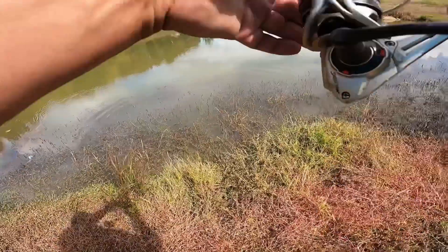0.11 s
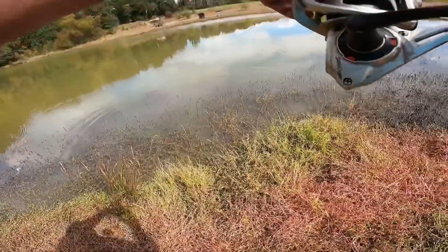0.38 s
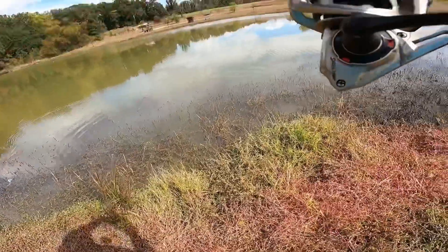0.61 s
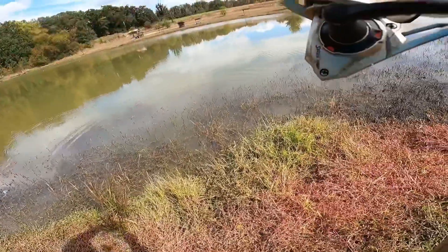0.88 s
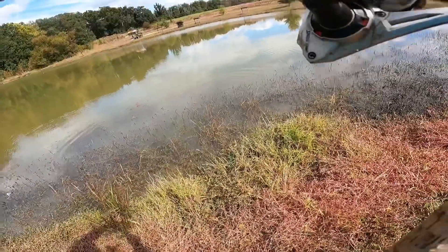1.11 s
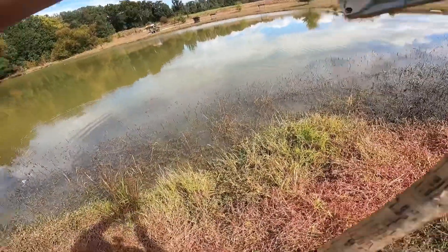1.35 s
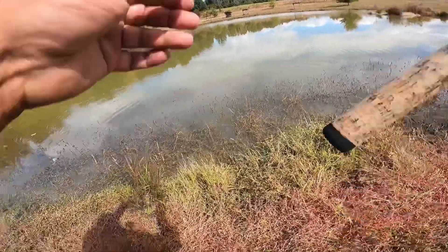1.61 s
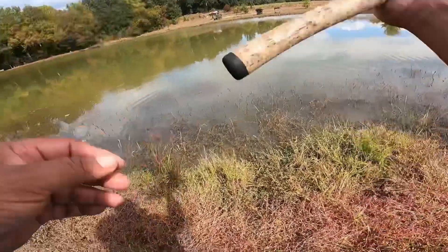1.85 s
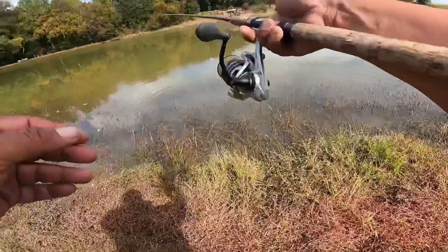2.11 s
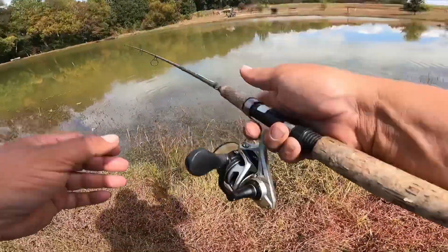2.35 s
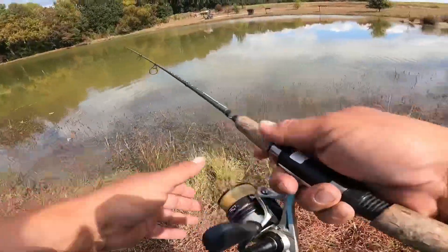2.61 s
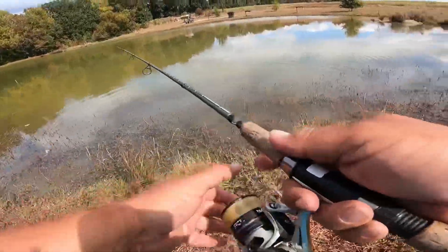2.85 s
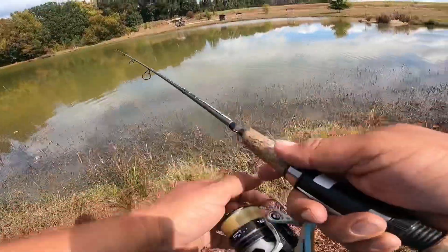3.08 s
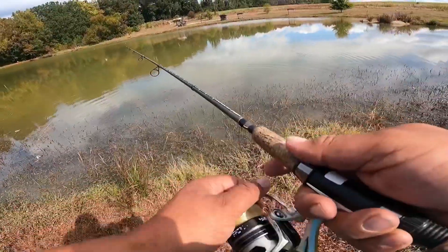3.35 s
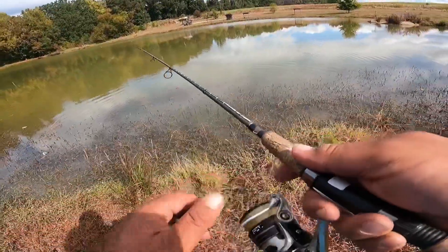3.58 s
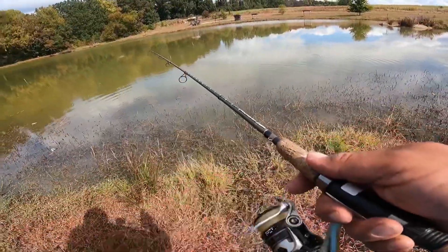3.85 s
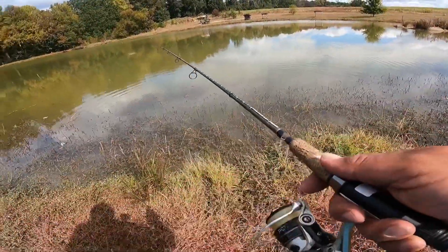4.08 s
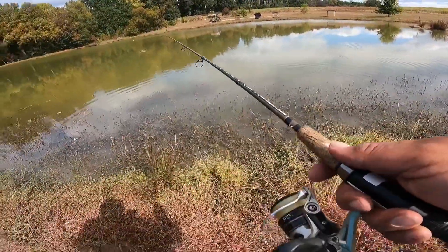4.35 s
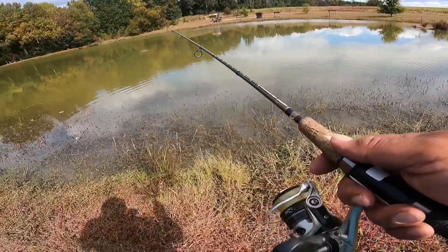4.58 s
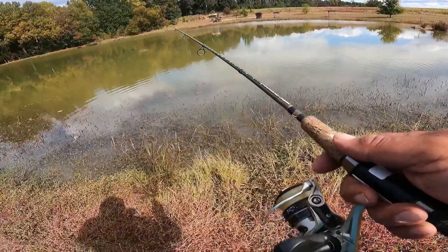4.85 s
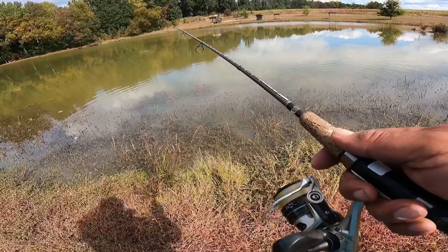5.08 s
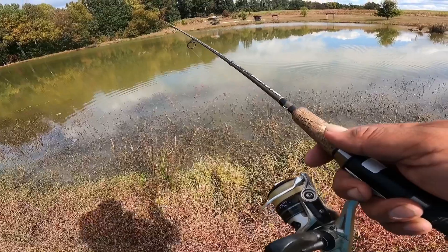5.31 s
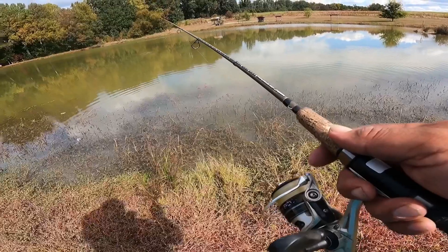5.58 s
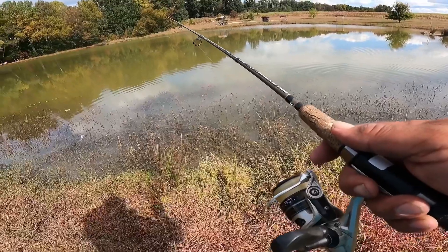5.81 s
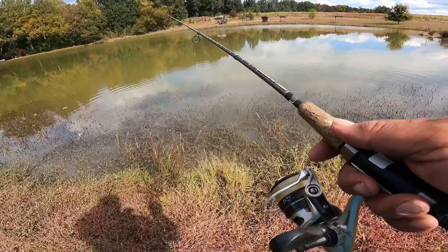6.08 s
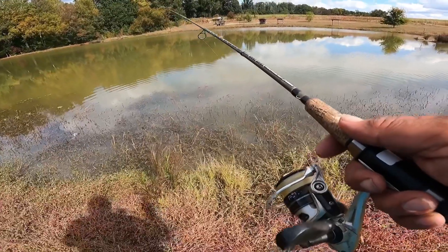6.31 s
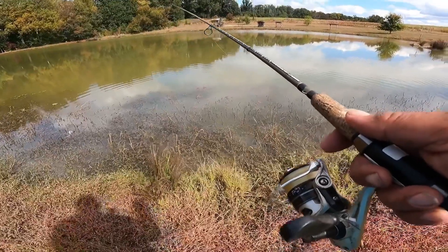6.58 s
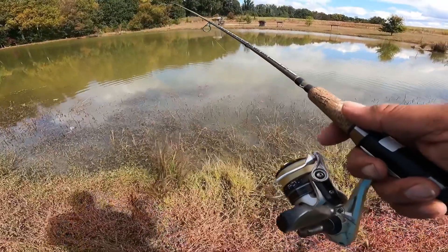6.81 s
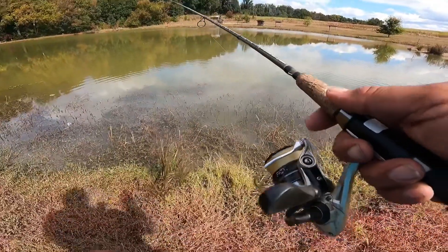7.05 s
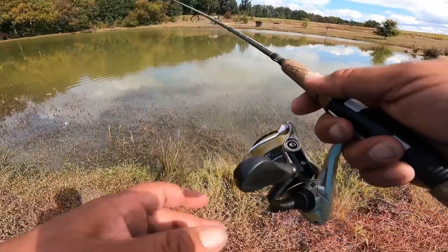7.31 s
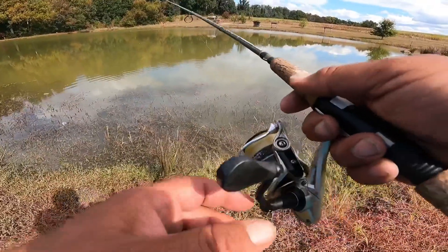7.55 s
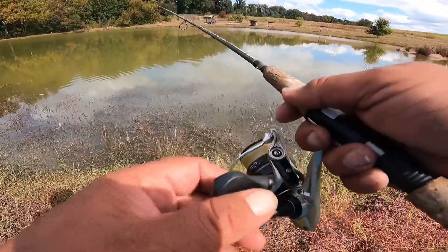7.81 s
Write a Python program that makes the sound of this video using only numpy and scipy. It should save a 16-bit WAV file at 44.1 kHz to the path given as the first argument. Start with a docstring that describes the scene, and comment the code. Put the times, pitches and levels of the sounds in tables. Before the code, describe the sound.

Outdoors by a pond, a katydid buzzes then ticks, a far engine chugs, and a handled reel gives two loud sharp clacks.

```python
"""Fishing reel in an insect field

A fishing reel is handled close by: cracks and ringing wire as its bail snaps open and shut, with ragged
slides, small ticks and cork thuds. A far engine of steady orders and puffing roar idles and slows.
A near katydid, noise through wing resonances, buzzes and then ticks in single strokes. Coloured noise is
the far chorus; raspy chips, cricket trills, one falling bird chirp and low wind lumps complete the field."""
import sys
import numpy as np
from scipy import signal
from scipy.fft import rfft, irfft, next_fast_len
from scipy.io import wavfile
from scipy.ndimage import uniform_filter1d

SR = 44100
rng = np.random.default_rng(int(sys.argv[2]) if len(sys.argv) > 2 else 0)


def dump(signal):
    """Clip the signal to [-1, 1] and save it as 16-bit WAV at the path in sys.argv[1]."""
    limited = np.clip(np.atleast_2d(signal).T, -1, 1)
    pcm = np.round(limited * 32767).astype(np.int16)
    wavfile.write(sys.argv[1], SR, pcm)


def field_ratio(decibels):
    """Amplitude ratio for a level in dB (20 dB per decade); scalars and array-likes work."""
    return 10 ** (np.asarray(decibels, dtype=float) / 20)


N = 349618
T = np.arange(N) / SR


def evened(x):
    """Scales to rms 1."""
    return x / np.sqrt(np.mean(x ** 2) + 1e-20)


def read(points, hz):
    """Reads a spectrum table at hz, along a logarithmic frequency axis."""
    f, value = np.transpose(points)
    return np.interp(np.log(hz + 1), np.log(f + 1), value)


def curve(rows, axis=1):
    """Draws one column of a table as a line over time."""
    return np.interp(T, np.array(rows)[:, 0], np.array(rows)[:, axis])


def swells(rows, rest_db):
    """Gain over time: bell-shaped swells (time [s], spread [s], level [dB]) above a resting level."""
    power = field_ratio(2 * rest_db)
    power = power + sum(field_ratio(2 * db) * np.exp(-((T - s) / spread) ** 2) for s, spread, db in rows)
    return np.sqrt(power)


def wander(width):
    """Slow random drift, smoothed over width samples, rms 1."""
    return evened(uniform_filter1d(rng.standard_normal(N), size=width))


def add(mix, s, sound):
    """Mixes a sound in at s seconds."""
    part = mix[..., round(s * SR):][..., :sound.shape[-1]]
    part += sound[..., :part.shape[-1]]


def panned(x, db):
    """Places a mono sound by its left-right level difference."""
    return x * field_ratio(np.array([[db / 2], [-db / 2]]))


# Stereo width of the noise beds: (frequency [Hz], left-right likeness [1 = same])
LIKENESS = [(60, 1), (150, 0.74), (380, 0.94), (950, 0.57), (2380, 0.31), (5980, 0.75), (15000, 0.26)]


def noise(spectrum, patchy_db):
    """Stereo noise of a given colour whose level varies in patches over time and frequency, rms 1."""
    hz = np.fft.rfftfreq(1024, 1 / SR)
    a, b, c, d, patches = rng.standard_normal((N // 256 + 5, 513, 5)).T
    patches = uniform_filter1d(patches, size=8, axis=0)
    patches = evened(uniform_filter1d(patches, size=14, axis=1))
    same = np.clip(read(LIKENESS, hz), -1, 1)[:, None]
    left = a + 1j * b
    right = same * left + np.sqrt(1 - same ** 2) * (c + 1j * d)
    z = np.array([left, right]) * field_ratio(read(spectrum, hz)[:, None] + patchy_db * patches)
    return evened(signal.istft(z, nperseg=1024, noverlap=768)[1][:, :N])


def rasp(resonances, drift_db=1.84):
    """Noise through resonances, each applied twice for steep flanks and swelling on its own, rms 1."""
    out = np.zeros(N)
    for hz, width, db in resonances:
        b, a = signal.iirpeak(hz, hz / width, SR)
        band = signal.lfilter(b, a, signal.lfilter(b, a, rng.standard_normal(N)))
        out += field_ratio(db + drift_db * wander(SR // 8)) * evened(band)
    return evened(out)


# Colour of the far chorus: (frequency [Hz], relative level [dB per Hz])
CHORUS_COLOUR = [(470, -34), (800, -14), (1100, 0.5), (2500, -28), (3150, -22), (3450, 4.5), (3900, 4.5),
                 (4250, -24), (5050, -19), (7450, -9), (8900, -1), (9500, -2), (10300, -12.5), (12800, -8),
                 (15000, -24), (16000, -39.5)]


def far_chorus():
    """Many far insects blended into a patchy noise bed."""
    return field_ratio(-61.5) * noise(CHORUS_COLOUR, patchy_db=1.8)


# Engine speed: (time [s], cycles per second [Hz])
ENGINE_SPEED = [(0, 14.25), (2, 14.16), (4.5, 14.12), (5.5, 14.01), (7.93, 13.91)]
# Strength of the engine orders: (multiple of the cycle [-], relative level [dB])
EXHAUST_ORDERS = [(2, -19), (3, -15), (4, 0), (5, -3), (6, -3.5), (7, -2), (8, -9), (9, -5), (11, -12.5),
                  (12, -13.5), (13, -11.5), (14, -20.5)]
# How the engine carries over the field: (time [s], relative level [dB])
CARRY_OVER_FIELD = [(0, -54), (2.85, -50), (3.1, -46.5), (3.65, -43), (4.7, -47.5), (5.3, -56.5),
                    (5.75, -49.5), (6.3, -45), (6.9, -52.5), (7.93, -55)]
# Swelling of the exhaust roar: (time [s], relative level [dB])
ROAR_LEVEL = [(0, -62.5), (.7, -59), (1.5, -57.5), (2.15, -58), (2.35, -62.5), (2.76, -56), (3.82, -56.5),
              (4.25, -60), (4.65, -57), (5.2, -60), (5.87, -54), (6.47, -57), (6.8, -60.5), (7.93, -62)]
# Colour of the exhaust roar: (frequency [Hz], relative level [dB per Hz])
ROAR_COLOUR = [(200, -27), (290, -0.5), (360, 1.5), (450, 0.5), (600, -6.5), (760, -20), (1000, -35.5)]
# Colour of the upper roar, strongest when the path is clear: (frequency [Hz], relative level [dB per Hz])
UPPER_ROAR_COLOUR = [(450, -28), (620, 1), (780, -5.5), (1000, -28.5)]
# Colour of far traffic and engine block: (frequency [Hz], relative level [dB per Hz])
RUMBLE_COLOUR = [(40, -21), (70, 1), (120, 0), (190, -4), (260, -10), (400, -37)]


def engine():
    """Clean orders of the cycle that swell as the sound carries, and a roar that puffs twice a cycle."""
    first_turn = 0.254  # share of a cycle already run at the start
    carry_mid_db = -47.5
    steeper = 0.04  # orders follow the carry more steeply by this share a step, up to the seventh
    turns = first_turn + np.cumsum(curve(ENGINE_SPEED)) / SR
    carry = curve(CARRY_OVER_FIELD) - carry_mid_db
    tones = np.zeros(N)
    for k, db in EXHAUST_ORDERS:
        drift = wander(SR // 2)  # moving air bends the path
        own_db = db + 0.38 * drift if k in (4, 5, 7) else db - 6.5 + 2.0 * drift
        lag = 1.45 + 0.4496 * (k - 5) ** 2 + 0.19 * drift  # the pipe spreads each pulse around its resonance
        level_db = carry_mid_db + carry * (1 + steeper * (min(k, 7) - 4)) + own_db - 0.5
        tones += np.sqrt(2) * field_ratio(level_db) * np.cos(2 * np.pi * k * turns - lag)

    roar_db = curve(ROAR_LEVEL)
    clear = field_ratio(roar_db - roar_db.max())  # the firings stand out when the path is clear
    puffs = 0.4 + clear * np.sin(2 * np.pi * (turns + 0.05)) ** 4  # two firings a cycle
    upper = 0.42 * clear ** 3 * noise(UPPER_ROAR_COLOUR, patchy_db=7.0)
    roar = evened((noise(ROAR_COLOUR, patchy_db=1.0) + upper) * puffs) * field_ratio(roar_db + 0.78)
    rumble = noise(RUMBLE_COLOUR, patchy_db=2.5) * field_ratio(-52 + 0.11 * carry)  # swells with the orders
    return panned(tones, -0.2) + roar + rumble


# Katydid wing speed: (time [s], wing cycles per second [Hz])
WING_SPEED = [(0, 50.92), (.8, 50.12), (1.6, 49.85), (2.5, 49.25), (3.85, 48.84), (4.27, 47.4)]
# Effort of the buzz, which stops at the last row: (time [s], relative level [dB])
BUZZ_EFFORT = [(0, -53), (1.4, -51.5), (2.1, -53.5), (2.82, -54.5), (3.0, -58.5), (3.45, -59.5), (3.8, -59),
               (3.84, -54), (4.27, -54)]
# Single wing cycles, short stroke then long: (time [s], nominal gap [s], relative level [dB])
SINGLE_STROKES = [(4.715, 0.047, -41.5), (4.785, 0.03, -43), (4.899, 0.036, -39.5), (4.9602, 0.033, -38.5),
                  (5.031, 0.031, -40), (5.0984, .0316, -42), (5.165, .0305, -40), (5.2286, 0.039, -40),
                  (5.296, 0.035, -39), (5.371, 0.031, -38.5), (5.4437, 0.035, -38), (5.5084, 0.034, -38.5),
                  (5.577, 0.032, -37.5), (5.645, 0.037, -37.5), (5.7656, 0.036, -38.5),
                  (5.8636, 0.035, -38.5), (6.3465, 0.041, -42.5), (6.417, 0.036, -40),
                  (6.485, 0.032, -39.5), (6.5592, 0.035, -39), (6.6424, 0.037, -38.5), (6.711, .0325, -38),
                  (6.787, .0325, -39.5), (6.8563, 0.035, -37), (6.936, 0.037, -38.5), (7.022, 0.034, -38.5),
                  (7.105, 0.038, -41.5), (7.179, 0.035, -39), (7.249, 0.037, -40), (7.3323, 0.031, -41),
                  (7.3987, .0364, -42), (7.466, 0.034, -43.5), (7.5503, 0.034, -42), (7.642, 0.038, -41),
                  (7.734, 0.032, -39), (7.8126, 0.032, -40), (7.89, 0.038, -39)]
# Lower wing resonances, the short stroke: (frequency [Hz], width of one pass [Hz], relative level [dB])
SHORT_STROKE_WING = [(7230, 1200, -6), (7900, 630, -4), (8890, 520, -0.5), (9850, 500, 1),
                     (10500, 380, -0.5), (11700, 870, 1)]
# Higher wing resonances, the long stroke: (frequency [Hz], width of one pass [Hz], relative level [dB])
LONG_STROKE_WING = [(9750, 600, -8), (11280, 360, -4), (12020, 350, -0.5), (12670, 430, -6),
                    (13130, 560, -7), (14400, 600, -14)]


def katydid():
    """A long swelling stroke and a short lower one in each wing cycle; later the strokes come singly."""
    cycle = (0.53 + np.cumsum(curve(WING_SPEED)) / SR) % 1
    long_shape = np.where(cycle < 0.67, field_ratio(-9.0 * (1.5 - cycle / 0.48)), 0.25)
    short_shape = 0.46 + np.exp(-((cycle - 0.9) / 0.071) ** 2)
    short_shape += 0.18 * np.exp(-((cycle - 0.62) / 0.063) ** 2)
    effort = field_ratio(curve(BUZZ_EFFORT) - 2.0) * (T < BUZZ_EFFORT[-1][0])
    high, low = 2.0 * long_shape * effort, 1.86 * short_shape * effort

    u = np.linspace(0, 1, round(0.012 * SR))
    hitch = 1.3 - 0.42 * np.exp(-((u - 0.42) / 0.11) ** 2)  # the long stroke catches midway
    hitch *= signal.windows.tukey(len(u), 0.5)
    for s, gap, db in SINGLE_STROKES:
        add(low, s - 0.0048, field_ratio(db - 9.0) * np.hanning(round(0.014 * SR)))
        stroke = field_ratio(db - 14.0) * hitch
        add(high, s + gap - 0.004, stroke)
        add(low, s + gap - 0.004, 0.73 * stroke)

    teeth = field_ratio(2.0 * wander(40))  # the file's teeth catch unevenly
    high = high * evened(teeth * rasp(LONG_STROKE_WING))
    low = low * evened(teeth * rasp(SHORT_STROKE_WING))
    top = signal.sosfiltfilt(signal.butter(4, 11300, "highpass", fs=SR, output="sos"), high)
    shifted = 0.64 * np.pad(top, (1, 0))[:N]  # the top reaches the two ports out of step
    return panned(low, 1.0) + panned(high, 4.0) + np.array([shifted, -shifted])


# Lumps of wind: (time [s], spread [s], level [dB])
WIND_GUSTS = [(.24, 0.058, -54), (.66, 0.056, -49), (1.06, 0.032, -38.5), (2.3, 1, -53.5), (4.1, 0.55, -46),
              (7.11, 0.035, -43), (7.9, 0.073, -40)]


def wind():
    """Low lumpy pressure on the microphone: noise around 16-42 Hz, nearly alike in both ports."""
    low = signal.butter(2, [16, 42], "bandpass", fs=SR, output="sos")
    common, own = signal.sosfilt(low, rng.standard_normal((2, N)))
    pressure = evened(np.array([common + 0.066 * own, common - 0.3 * own]))
    return swells(WIND_GUSTS, rest_db=-57) * pressure


# Hands, cloth and grass: (time [s], spread [s], relative level [dB], bright part against the dull [dB])
HANDLING_MOVES = [(.35, 0.29, -59.5, -3.5), (1.05, 0.41, -67, -2.5), (1.6, 0.24, -58, -5.5),
                  (2.1, 0.19, -58, -3), (3.0, 0.43, -62, -5), (3.8, 0.2, -60, -10),
                  (4.12, 0.19, -62.5, -4.5), (5.23, 0.17, -63.5, -3), (6.31, 0.084, -64, -2),
                  (6.55, 0.18, -67.5, -3.5), (7.3, 0.35, -63.5, -5)]
# Colour of the dull part: (frequency [Hz], relative level [dB per Hz])
DULL_COLOUR = [(600, -7.5), (900, -5), (1500, -5.5), (2100, -16.5), (3000, -22.5)]
# Colour of the bright part: (frequency [Hz], relative level [dB per Hz])
BRIGHT_COLOUR = [(1300, -14), (2000, 0.5), (3000, -2), (5000, -2), (8000, -12), (11000, -29)]
# Ragged slides of line and fittings: (time [s], rise constant [s], fall constant [s], level [dB])
LINE_SLIDES = [(2.21, 0.073, 0.1, -53), (3.65, 0.004, 0.013, -32), (3.63, 0.0036, 0.0087, -46.5)]


def rustle():
    """Grainy friction noise: a dull and a bright part, and short ragged slides."""
    still_db, trim = -78, field_ratio(2.0)
    grains = field_ratio(1.5 * wander(120))
    dull = evened(noise(DULL_COLOUR, patchy_db=2.5) * grains)
    bright = evened(noise(BRIGHT_COLOUR, patchy_db=2.0) * grains)
    dull_moves = [(s, spread, db) for s, spread, db, _ in HANDLING_MOVES]
    bright_moves = [(s, spread, db + bright_db) for s, spread, db, bright_db in HANDLING_MOVES]
    slides = np.zeros(N)
    for s, rise, fall, db in LINE_SLIDES:
        slides += field_ratio(db) * np.exp(-abs(T - s) / np.where(T < s, rise, fall))
    catches = evened(field_ratio(4.7 * wander(50)))  # the line sticks and lets go
    dull_gain = trim * swells(dull_moves, still_db)
    bright_gain = trim * swells(bright_moves, still_db) + slides * catches
    return panned(dull * dull_gain, 4.9) + panned(bright, 2.1) * bright_gain


# Blows on the reel: (time [s], relative crack level [dB], relative body level [dB],
# brightness [about dB per octave], deep modes against the rest of the body [dB])
REEL_BLOWS = [(0.2604, -60, -52, -5, -22), (0.3464, -42.5, -48, -9, -16), (0.422, -40, -63, 5, -23),
              (0.8647, -47, -47.5, -3, -25), (1.111, -40.5, -57, 6, -19), (1.2204, -47, -58, -7, -18),
              (1.2968, -10.5, -33.5, 8.5, -9), (1.3, -27, -54, 3, -14), (1.598, -52, -45.5, -6, -11),
              (2.121, -33, -61, -10.5, -24), (2.181, -37, -61, -3, -20), (2.1928, -37, -52, -5, -18),
              (2.1982, -38, -54, -2, -18), (2.205, -31.5, -52, -8.5, -19), (2.218, -39, -52, -4, -19),
              (2.2269, -32, -51, -5, -18), (2.2556, -31, -48, -9, -17), (2.261, -33, -46, -7, -19),
              (3.3153, -34.5, -49, 5, -18), (3.451, -34.5, -48.5, -7, -12), (3.5745, -10.5, -29, 6.5, -24),
              (3.6202, -40, -46, -3, -11), (3.6292, -33, -35, 1, -4), (3.6413, -17.5, -25, -2, -7.5),
              (3.6435, -14.5, -21, 0.5, -0.5), (3.6464, -13, -36, -4, -22), (3.6497, -17.5, -29, 4, -19),
              (3.653, -25, -40, -8.5, -8), (3.657, -26, -37, 1, -9), (3.659, -31, -39, -7, 4),
              (3.674, -41, -46, 2, -4)]
# Colour of the crack: (frequency [Hz], relative level [dB per Hz])
CRACK_COLOUR = [(900, -19), (2500, -7.5), (3600, 6), (6300, 5), (9300, -0.5), (11500, -2.5), (14000, -21),
                (16000, -38)]
# Ringing modes of the reel housing: (frequency [Hz], relative level [dB], 60 dB decay [s])
HOUSING_MODES = [(163, -14, 0.07), (667, -15, 0.043), (984, -13, 0.089), (1350, 9, 0.012),
                 (1520, 3.5, 0.015), (2310, -12.5, 0.02)]
# Ringing modes of the bail wire: (nominal frequency [Hz], relative level [dB], 60 dB decay [s])
WIRE_MODES = [(4450, 5, 0.018), (5540, -8, 0.016), (6200, -3, 0.018), (7840, -9, 0.021)]
# The housing shades the ports: (frequency [Hz], left-right level [dB])
HOUSING_SHADE = [(800, -2), (2500, -7), (5000, -1.5), (9000, -2.5), (14000, 2)]


def reel():
    """Each blow: a short crack, the bail wire and the housing ringing out; some blows reach the deep modes."""
    detune = 0.015  # the wire sits a little differently at each blow
    out, t = np.zeros((2, N)), T[:SR // 10]
    hz = np.fft.rfftfreq(len(t), 1 / SR)
    rise = np.minimum(t / 0.00045, 1) ** 2
    swing = np.sin(np.pi / 2 * np.minimum(t / 0.0016, 1)) ** 2  # the housing takes up the blow softly
    for s, crack_db, body_db, tilt_db, deep_db in REEL_BLOWS:
        tone = lambda f: tilt_db * np.log2(f / 4500 + 0.11)
        hiss = rfft(rng.standard_normal((3, len(t)))) * field_ratio(read(CRACK_COLOUR, hz) + tone(hz))
        hiss = irfft(hiss, len(t))
        snap, rattle, stray = hiss / np.std(hiss)
        crack = snap * field_ratio(-60 * t / 0.0053) + rattle * field_ratio(-18.5 - 60 * t / 0.021)

        wire = np.zeros(len(t))
        for f, db, t60 in WIRE_MODES:
            own_hz = f * (1 + detune * rng.standard_normal())
            ring = np.sin(2 * np.pi * (own_hz * t + rng.random()))
            wire += field_ratio(db + tone(f) - 60 * t / t60) * ring
        body = np.zeros(len(t))
        for f, db, t60 in HOUSING_MODES:
            mode_db = db + deep_db * (f < 1430)
            body += field_ratio(mode_db - 60 * t / t60) * np.sin(2 * np.pi * f * t)

        sideways = field_ratio(crack_db - 9.5) * stray * field_ratio(-60 * t / 0.007)
        sideways = sideways * np.array([[1], [-1]])  # the ports hear it unlike
        struck = field_ratio(crack_db + 3.5) * (crack + field_ratio(-22.5) * wire)
        add(out, s, rise * (struck + sideways) + field_ratio(body_db + 7.5) * body * swing)
    size = next_fast_len(N)
    shade_db = read(HOUSING_SHADE, np.fft.rfftfreq(size, 1 / SR)) / 2
    return irfft(rfft(out, size) * field_ratio(np.array([shade_db, -shade_db])), size)[:, :N]


# Raspy chips of a second insect: (time [s], relative level [dB])
INSECT_CHIPS = [(2.77, -50), (3.4211, -47), (4.0113, -62), (4.783, -50.5), (5.1984, -50.5), (5.7239, -47.5),
                (6.457, -48.5), (7.1043, -51), (7.7563, -49)]
# Cricket trills: (time [s], relative level [dB], pulses [count])
CRICKET_TRILLS = [(.81, -62, 6), (3.33, -62, 5), (5.255, -63.5, 7)]


def other_insects():
    """Throbbing noise chips with a lower echo, and short cricket trills of pure pulses."""
    front, tail, trills = np.zeros(N), np.zeros(N), np.zeros(N)
    t = T[:SR // 5]
    throb = (t < 0.045) * (0.5 + 0.5 * np.cos(2 * np.pi * 95 * t) ** 2)
    for s, db in INSECT_CHIPS:
        add(front, s, field_ratio(db - 10.5) * throb)
        add(tail, s, field_ratio(db - 12.5 - 60 * t / 0.7) * np.minimum(t / 0.016, 1))
    pulse = np.sin(2 * np.pi * 4490 * T[:500]) * (0.4 + 0.6 * np.hanning(500))
    for s, db, count in CRICKET_TRILLS:
        for k in range(count):
            add(trills, s + 0.0185 * k, field_ratio(db + 2.5 * rng.standard_normal()) * pulse)
    chips = front * rasp([(7360, 1400, 0)]) + tail * rasp([(6940, 1500, 0)])
    return panned(chips, 9.7) + panned(trills, 1.5)


# Thin ticks of line and fittings: (time [s], level [dB], tuning [Hz])
LINE_TICKS = [(2.3153, -47, 4700), (5.1188, -47, 2400), (5.3737, -48, 3200), (7.28, -51, 4000),
              (7.447, -49, 5500)]


def ticks():
    """Each tick is a puff of noise about an octave wide, gone in a few milliseconds."""
    out, t = np.zeros(N), T[:SR // 50]
    for s, db, hz in LINE_TICKS:
        band = signal.butter(2, [hz / 1.6, hz * 1.26], "bandpass", fs=SR, output="sos")
        puff = evened(signal.sosfilt(band, rng.standard_normal(len(t))))
        add(out, s, field_ratio(db - 60 * t / 0.0089) * puff)
    return panned(out, 3.2)


# Dull knocks of the cork grip: (time [s], level [dB])
GRIP_KNOCKS = [(6.0444, -50.5), (6.079, -53), (6.304, -51), (6.467, -49), (6.4915, -44), (6.498, -45),
               (6.667, -50), (6.8633, -52)]
# Colour of the cork: (frequency [Hz], relative level [dB per Hz])
CORK_COLOUR = [(500, -21), (900, 7), (1500, 3), (2600, -7), (3600, -15), (6000, -45)]


def grip():
    """Short thuds of coloured noise with no ring, as soft cork damps them."""
    cork_t60 = 0.016  # s
    out, t = np.zeros(N), T[:SR // 20]
    hz = np.fft.rfftfreq(len(t), 1 / SR)
    for s, db in GRIP_KNOCKS:
        thud = irfft(rfft(rng.standard_normal(len(t))) * field_ratio(read(CORK_COLOUR, hz)), len(t))
        add(out, s, field_ratio(db - 60 * t / cork_t60) * np.minimum(t / 0.00098, 1) * evened(thud))
    return panned(out, 6.5)


# One falling chirp: time [s], length [s], level [dB], start pitch [Hz], end pitch [Hz]
BIRD_CHIRP = (6.918, .034, -51, 7750, 7250)


def bird():
    """A far, pure whistle that slides down."""
    s, length, db, from_hz, to_hz = BIRD_CHIRP
    out, hz = np.zeros(N), np.linspace(from_hz, to_hz, round(length * SR))
    add(out, s, field_ratio(db) * np.hanning(len(hz)) * np.sin(2 * np.pi * np.cumsum(hz) / SR))
    return panned(out, 1.5)


def scene():
    """All sources over the far chorus."""
    background = far_chorus() + engine() + katydid() + wind()
    handling = rustle() + reel() + ticks() + grip()
    return background + handling + other_insects() + bird()


def band_limit(x):
    """A steep low-pass at the top of the band."""
    return signal.sosfilt(signal.butter(12, 16830, fs=SR, output="sos"), x)


def record(dry):
    """The microphone's band limit, a steep low-pass at 15.5 kHz."""
    edge = signal.firwin(255, 15500, window=("kaiser", 7), fs=SR)
    mix = signal.oaconvolve(dry, edge[None], "same")
    return band_limit(mix)


dry = scene()
out = record(dry)
dump(out)
```